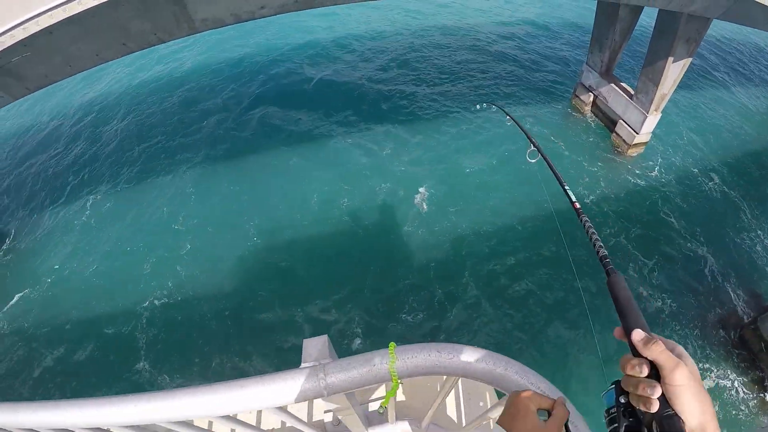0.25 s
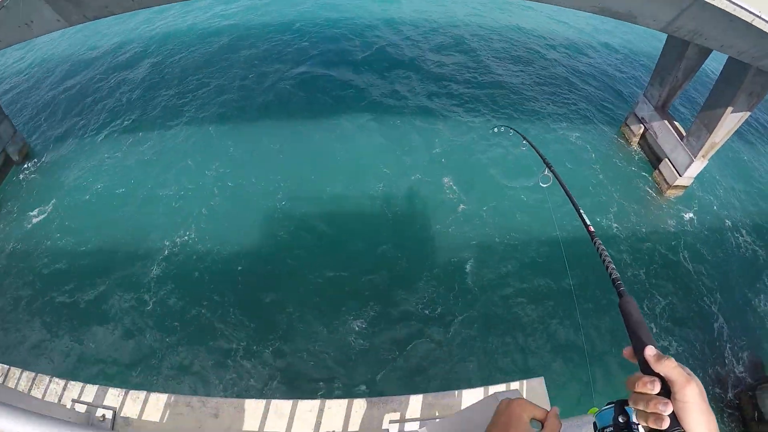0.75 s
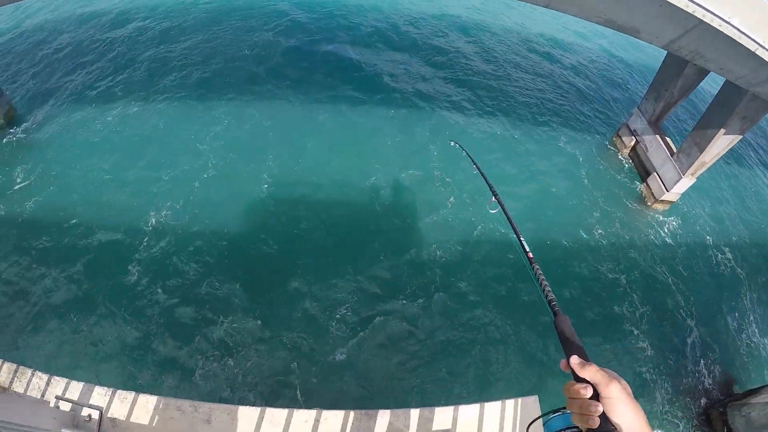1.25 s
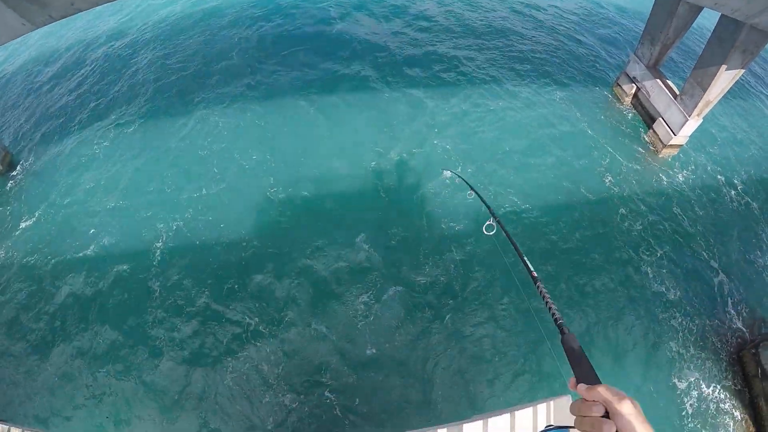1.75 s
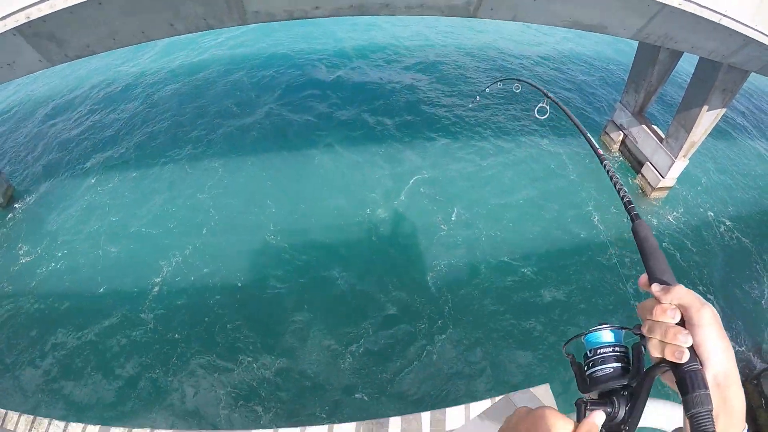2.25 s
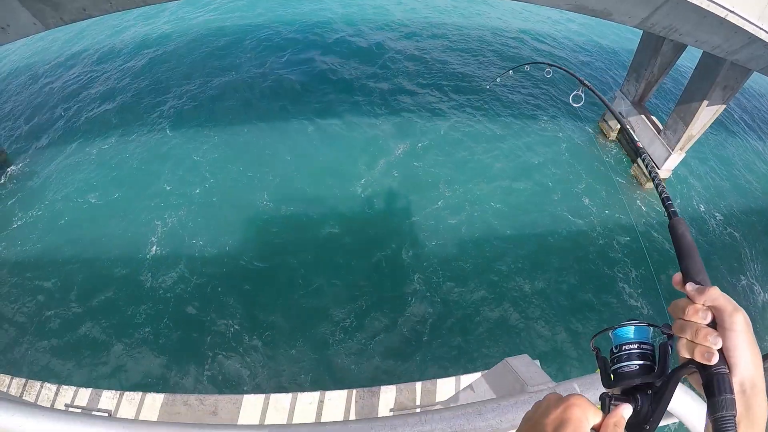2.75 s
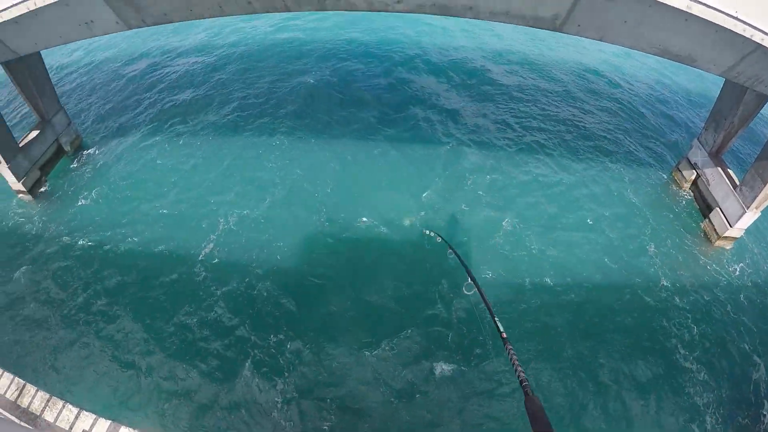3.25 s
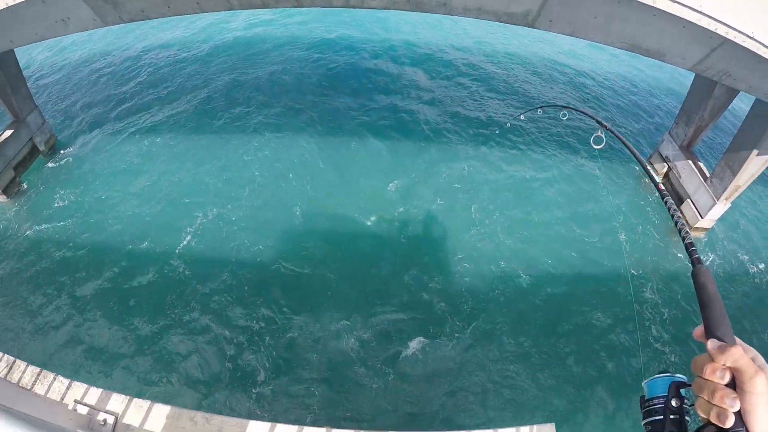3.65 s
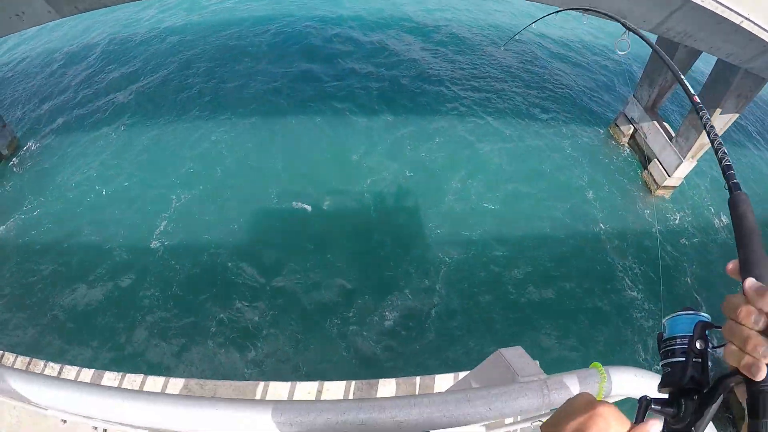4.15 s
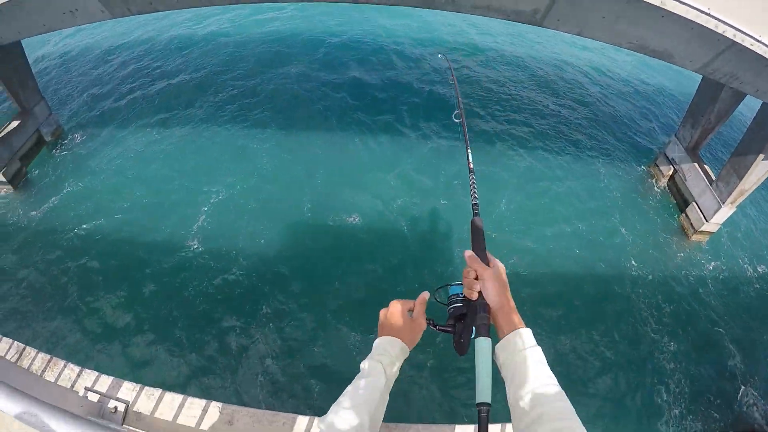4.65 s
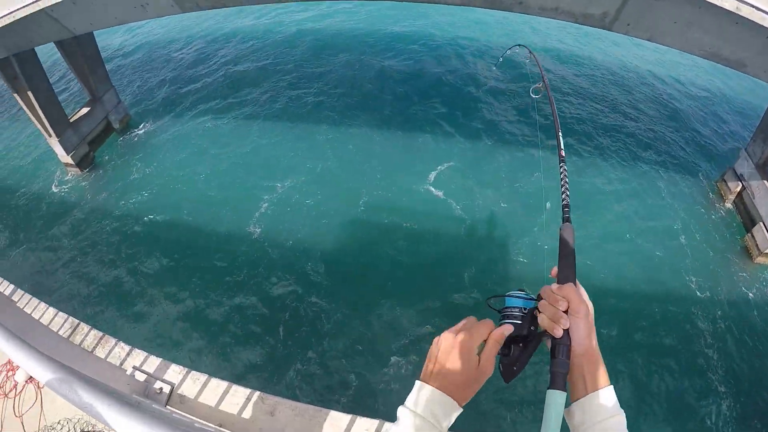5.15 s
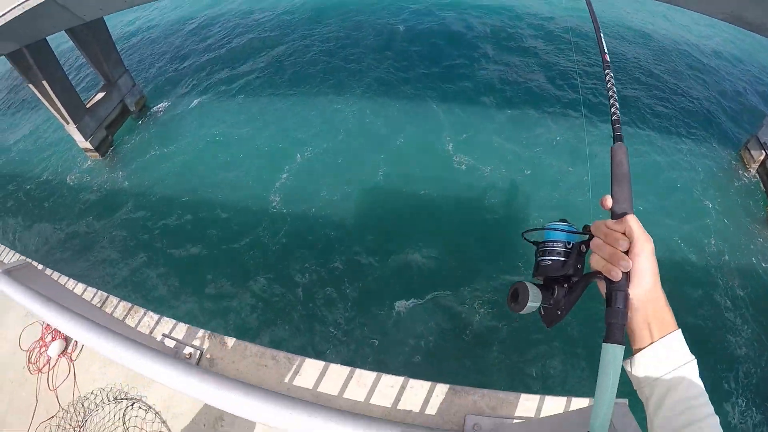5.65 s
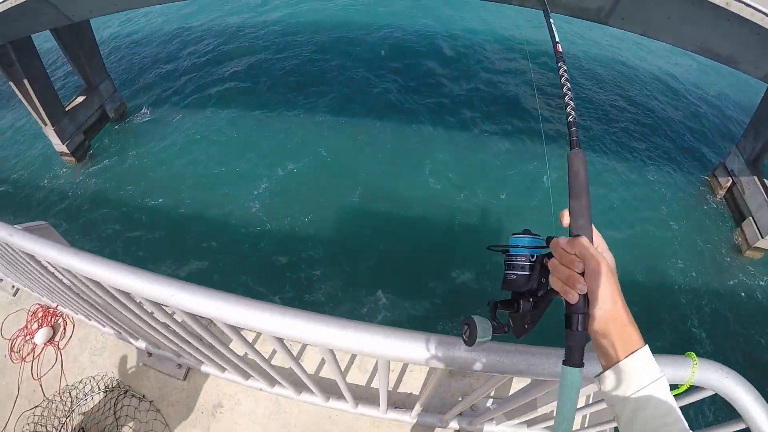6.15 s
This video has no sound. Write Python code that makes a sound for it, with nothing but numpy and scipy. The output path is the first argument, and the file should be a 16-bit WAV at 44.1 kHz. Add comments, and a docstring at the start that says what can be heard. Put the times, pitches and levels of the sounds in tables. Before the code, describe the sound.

Wind thumps and flutters over a continuous muffled sea rush and thin hiss; a fishing reel briefly clicks, then a heavier gust strikes near the end.

```python
"""On a bridge over the sea, wind buffets the microphone of a camera worn by an angler.
Turbulence at the port is low noise, shaped by gusts and single thumps, over a rush of water and air:
bands of noise coloured by the hollows of the camera case. Swells of bright noise are the line swishing
as the rod is worked; midway, decaying modes and grit make a short run of ratchet clicks on the reel,
and a faint tone sings on. Now and then the hiss drops out for an instant."""
import sys
import numpy as np
from scipy import signal
from scipy.fft import rfft, irfft
from scipy.io import wavfile

SR = 44100
rng = np.random.default_rng(int(sys.argv[2]) if len(sys.argv) > 2 else 0)


def dump_mix(stems):
    """Bounce the given channels to the path in sys.argv[1] as a 16-bit WAV at rate SR."""
    frames = np.atleast_2d(stems).T  # one column per channel
    limited = np.clip(frames, -1, 1)  # hard clip at full scale
    pcm = np.round(limited * 32767).astype(np.int16)
    wavfile.write(sys.argv[1], SR, pcm)


N = 282240
TIME = np.arange(N) / SR
BINS = np.fft.rfftfreq(N, 1 / SR)

# All table levels are relative: the functions add their own level settings.
# Every *_COLOUR table is a noise spectrum with columns: frequency_hz, density_db (per Hz).


def amp(db):
    """Decibel law: level to amplitude ratio."""
    return 10 ** (np.asarray(db) / 20)


def evened(x):
    """Power normalisation: scales to rms 1."""
    return x / np.sqrt(np.mean(x ** 2) + 1e-20)


def gains(rows):
    """Envelope interpolation, linear in decibels: one gain curve for each level column."""
    times_s, *columns = np.transpose(rows)
    return [amp(np.interp(TIME, times_s, levels_db)) for levels_db in columns]


def swells(rows):
    """Superposition of Gaussian envelopes, one for each row."""
    return sum(amp(db) * np.exp(-((TIME - s) / half) ** 2) for s, db, half in rows)


def noise(colour):
    """Spectral shaping: Gaussian noise of rms 1, with 12 dB per octave skirts beyond the table."""
    hz, db = np.transpose(colour)
    skirts = np.minimum(1, BINS / hz[0]) ** 2 / np.maximum(1, BINS / hz[-1]) ** 2
    shape = amp(np.interp(np.log(BINS + 1), np.log(hz + 1), db)) * skirts
    white = rng.standard_normal(N)
    return evened(irfft(rfft(white) * shape, N))


def wander(hz):
    """Slow random modulation: low-passed noise of rms 1, up to about the given rate."""
    white = rng.standard_normal(N)
    return evened(irfft(rfft(white) * np.exp(-(BINS / hz) ** 2), N))


def below(x, hz, order=8):
    """Low-pass filtering without phase shift."""
    return irfft(rfft(x) / (1 + (BINS / hz) ** order), N)


def eddies(colour, evenness):
    """Envelope compression: turbulence whose lulls are partly filled, so gusts decide its strength."""
    x = noise(colour)
    size = np.sqrt(abs(signal.hilbert(x)) ** 2 + 0.42)
    return evened(x / size ** evenness)


def add(mix, s, sound):
    """Superposition: mixes a sound in at time s."""
    part = mix[round(s * SR):][:len(sound)]
    part += sound[:len(part)]


# rush of water and air: time_s, body_db, case_ring_db, upper_db
RUSH_LEVELS = [(0, -52, -48.5, -49.5), (0.3, -52.5, -48, -50), (0.7, -54, -49, -54.0),
               (1.3, -52.5, -43.5, -53.5), (1.63, -50.5, -44.5, -51.5), (1.9, -53.0, -49.5, -52),
               (2.8, -54, -47.5, -53.5), (3.08, -50.5, -43.0, -50.5), (3.3, -49.5, -47.5, -49.5),
               (3.7, -52.5, -48.5, -55.0), (3.95, -52, -46, -53.5), (4.3, -52, -47.5, -52),
               (4.6, -50.5, -44.5, -52), (4.97, -49, -46.0, -49), (5.3, -51.5, -48.5, -52),
               (5.7, -53, -47, -52), (6.05, -54.5, -49.5, -54.5), (6.4, -54, -48.5, -55)]
# ordinary level of the rush, from which its low end and the hiss follow it (dB)
RUSH_DB = -52
# soft swishes, probably line sliding through the rod rings: centre_s, level_db, half_length_s (to 1/e)
SWISHES = [(1.08, -69, .07), (2.59, -70, 0.084), (3.26, -65.5, 0.29), (4.65, -69, .05), (5.8, -71, 0.18)]
# the hiss, its finest treble and the swishes: frequency_hz, density_db (per Hz)
SPRAY_COLOUR = [(3500, -10.5), (4700, 11), (5400, -1), (5560, 7.5), (5700, 1), (5900, -0.5), (6300, 3),
                (6600, -0.5), (6850, 2), (7600, -3.5), (8300, -7), (10000, -43)]
FIZZ_COLOUR = [(6500, -25), (8400, 1), (9000, 1), (9700, 1), (10100, 1), (10600, -0.5), (11300, -1.5),
               (12300, -2), (13200, -2.5), (15300, -4.5)]
SWISH_COLOUR = [(3800, 2), (4800, 13.5), (5200, 4), (5550, 10), (5870, 0), (6200, 7), (6550, 1),
                (6800, 6.5), (7300, -1), (7900, -1), (8500, -6), (9050, -5), (9400, 2), (9900, 0),
                (10500, -10), (11500, -13), (11900, -3), (12400, -3), (12800, -11), (13400, -9),
                (14000, -18)]


def spray(hiss_db=-65, fizz_db=-73, follow=0.15, swish_db=5.5, flicker_db=1.0, drift_db=.5):
    """Amplitude-modulated noise: a thin flickering hiss follows the rush a little, under swishes."""
    upper = gains(RUSH_LEVELS)[-1]
    bed = (upper / amp(RUSH_DB)) ** follow * amp(drift_db * wander(9))
    hiss = bed * (amp(hiss_db) * noise(SPRAY_COLOUR) + amp(fizz_db) * noise(FIZZ_COLOUR))
    swish = amp(swish_db) * swells(SWISHES) * noise(SWISH_COLOUR)
    return (hiss + swish) * amp(flicker_db * wander(120))


# bands of the rush, from low to high: frequency_hz, density_db (per Hz)
LOW_COLOUR = [(150, -10.5), (350, -4.5), (530, -0.5), (680, 3), (780, 6), (880, -8), (1100, -49)]
BODY_COLOUR = [(600, -27), (760, -5), (850, 2), (970, 3), (1080, 1.5), (1180, -6), (1400, -3), (2200, -44)]
RING_COLOUR = [(900, -59), (1200, -20.5), (1400, -7.5), (1520, -1), (1600, 3.5), (1660, 1), (1720, 3.5),
               (1790, -4), (1920, -1.5), (2150, -8.5), (2600, -30)]
SHOULDER_COLOUR = [(1400, -56), (1650, 0), (1760, 2.5), (1920, -11), (2100, -32), (2400, -17), (2650, -3.5),
                   (3000, -42)]
UPPER_COLOUR = [(1700, -19), (2200, 2.5), (2620, 4.5), (2870, 1), (3020, 4), (3220, 3), (3380, 2),
                (3560, 3.5), (3780, 4), (4030, -13), (4280, -4.5), (4480, -15.5), (4730, -13.5),
                (5300, -31)]


def rush(low_db=-6.5, low_follow=0.98, body_db=-0.34, ring_db=-0.4, upper_db=-.3,
         shoulder_db=-6, shoulder_reference_db=-45, churn_db=0.76, throb_db=.5):
    """Resonant colouring: churning water and air heard through the broad resonances of the case."""
    body, ring, upper = gains(RUSH_LEVELS)
    low = amp(RUSH_DB + low_db) * (body / amp(RUSH_DB)) ** low_follow
    roar = low * noise(LOW_COLOUR) + amp(body_db) * body * noise(BODY_COLOUR)
    # the stronger the hollow ring, the larger the share of its shoulder
    shoulder = amp(shoulder_db) * ring / amp(shoulder_reference_db) * noise(SHOULDER_COLOUR)
    throb = amp(throb_db * wander(17))
    hollow = amp(ring_db) * ring * (noise(RING_COLOUR) + shoulder) * throb
    high = amp(upper_db) * upper * noise(UPPER_COLOUR)
    return (roar + hollow + high) * amp(churn_db * wander(25))


# brief dropouts of the hiss: centre_s, length_s (between 1/e points of the cut in dB), depth_db
DIPS = [(0.172, .013, 30), (.301, 0.011, 16), (0.687, .012, 24), (0.876, 0.018, 13), (1.272, 0.033, 28),
        (1.942, 0.023, 12), (2.263, 0.01, 19), (2.449, 0.033, 30), (2.649, 0.009, 17), (3.805, 0.016, 14),
        (4.394, 0.013, 32), (6.274, 0.02, 13), (6.36, 0.01, 18)]
# faint valleys of the rush that thin in a dropout: centre_hz, half_width_hz (to 1/e), share (of depth)
VALLEYS = [(483, 320, 1), (1250, 82, .5), (2320, 220, 0.36), (2950, 160, 0.37)]


def dropouts(x, split_hz=3900):
    """Time-varying filtering: the hiss dips for instants, and the valleys of the rush thin with it."""
    cut_db = sum(depth * np.exp(-(2 * (TIME - s) / length) ** 4) for s, length, depth in DIPS)
    hiss = x - below(x, split_hz, order=24)
    out = x + hiss * (amp(-cut_db) - 1)
    for hz, width, share in VALLEYS:
        valley = irfft(rfft(x) * np.exp(-((BINS - hz) / width) ** 2), N)
        out = out + valley * (amp(-share * cut_db) - 1)
    return out


# ratchet of the reel: start_s, level_db, brightness_db (relative, of the modes from 8 to 11 kHz)
CLICKS = [(3.4755, -47, -18), (3.5154, -45, -1), (3.5458, -50, -5), (3.5674, -47, -11), (3.5803, -43, -20),
          (3.5912, -40, -24), (3.6012, -38, -26), (3.6124, -38, -36.5), (3.625, -41, -27),
          (3.6426, -43, -26), (3.6671, -46, -20), (3.715, -47, -10)]


def singing(level_db=-25, t60=1.2, pitch_hz=4755):
    """Energy storage: the rim of the spool gathers energy from the clicks and sings on faintly."""
    energy = np.zeros(N)
    t = np.arange(SR) / SR
    for s, db, _ in CLICKS:
        add(energy, s, amp(db - 60 * t / t60) ** 2)
    return amp(level_db) * np.sqrt(energy) * np.sin(2 * np.pi * pitch_hz * TIME)


# modes of the spool, rung by each click: pitch_hz, level_db, t60_s (decay by 60 dB)
SPOOL_MODES = [(4270, -8, 0.027), (4740, -2, 0.031), (5080, -9, .02), (5370, -2.5, 0.021),
               (5600, -4.5, 0.028), (6140, -9, 0.03), (7740, -15.5, 0.039), (8700, -11.5, .02),
               (9300, -9, 0.026), (9750, -9, .02), (12200, -27, .15)]


def reel(level_db=2.5, rise_s=.0006, bright=0.73, snap_db=-13, snap_s=0.0026):
    """Modal excitation: the pawl snaps over its teeth, a gritty tick and the ring of the spool."""
    t, out = np.arange(SR // 2) / SR, np.zeros(N)
    treble = signal.butter(2, [4500, 12000], "band", fs=SR, output="sos")
    for s, db, bright_db in CLICKS:
        ring = np.zeros(len(t))
        for hz, mode_db, t60 in SPOOL_MODES:
            tilt_db = bright * (bright_db + 13) * (8000 < hz < 11000)
            decay = amp(mode_db + tilt_db - 60 * t / t60)
            ring += decay * np.sin(2 * np.pi * (hz * t + rng.random()))
        grit = signal.sosfilt(treble, rng.standard_normal(len(t)))
        click = ring / abs(ring).max() + amp(snap_db) * grit * np.exp(-t / snap_s)
        onset = 1 - np.exp(-t / rise_s)
        add(out, s, amp(db + level_db) * click * onset)
    return out


# single eddies that strike the port: start_s, level_db, rise_s
THUMPS = [(.568, -32.5, 0.0091), (1.098, -29.5, 0.013), (4.5, -29.5, 0.016), (4.788, -35, 0.015),
          (5.446, -35, 0.0061), (5.695, -28.5, 0.012), (6.053, -31.5, 0.012), (6.143, -26, 0.012)]
# dull noise of a thump: frequency_hz, density_db (per Hz)
THUMP_COLOUR = [(45, -10), (62, 5), (85, 0), (115, -15.5), (150, -24), (250, -28), (400, -39)]


def thumps(level_db=0):
    """Impulsive loading: each large eddy shoves the membrane with a fast rise and a slower decay."""
    force = np.zeros(N)
    u = np.arange(SR // 4) / SR
    for s, db, rise in THUMPS:
        add(force, s, amp(db) * u / rise * np.exp(1 - u / rise))
    return amp(level_db) * force * eddies(THUMP_COLOUR, evenness=1) / np.sqrt(2)


# strength of the wind at the port: time_s, level_db
WIND_LEVELS = [(0, -40.5), (0.85, -39.5), (2.2, -32.5), (2.8, -38.0), (3.3, -26.0), (3.7, -29.0),
               (4.2, -34.5), (4.7, -29.0), (5.25, -33.5), (5.7, -29.5), (6.4, -34.5)]
# ordinary wind strength, from which the buffeting follows it (dB)
BREEZE_DB = -33
# gusts that swell and sink over the port: centre_s, level_db, half_length_s (to 1/e)
GUSTS = [(.56, -33, 0.035), (1.17, -28.5, 0.036), (1.67, -34, 0.045), (1.83, -30, 0.017),
         (2.26, -29, 0.026), (2.41, -30.5, 0.035), (2.6, -34.5, 0.061), (4.56, -22.5, 0.051),
         (4.69, -28.5, 0.083), (5.78, -24, 0.024), (5.96, -22, 0.023), (6.075, -11.5, .028),
         (6.19, -19, 0.038)]
# flutter of small eddies: time_s, level_db
FLUTTER_LEVELS = [(0, -55), (0.9, -61), (1.1, -56.5), (2.68, -57.5), (2.8, -51), (3.55, -57.0),
                  (3.8, -53.5), (4.3, -56.5), (4.95, -52.5), (5.25, -53.5), (5.62, -49), (5.88, -56.5),
                  (6.4, -59.5)]
# large, middle and small eddies: frequency_hz, density_db (per Hz)
SWING_COLOUR = [(6, -8), (12, -1), (22, -4), (34, -3), (44, -10.5), (56, -24), (90, -63)]
BUFFET_COLOUR = [(35, -81), (52, 4.5), (72, 1.5), (100, -4), (130, -12), (200, -22.5), (400, -40)]
FLUTTER_COLOUR = [(80, -16), (140, 1), (200, -2.5), (275, -1.5), (310, -4.5), (350, -12), (480, -16.5),
                  (900, -34.5)]


def wind(swing_db=1.0, swing_top_hz=58, puffy_db=1.5, gust_db=3.0, buffet_db=-48, buffet_follow=0.63,
         gust_share=.3, flutter_db=-.5, lumpy_db=4, ragged_db=1.5):
    """Turbulent pressure: large eddies heave the membrane, while smaller ones come in lumps."""
    steady, = gains(WIND_LEVELS)
    flutter, = gains(FLUTTER_LEVELS)
    gusts = swells(GUSTS)
    lumps = np.clip(wander(21.5), -2, 2)
    puffs = amp(puffy_db * wander(12))
    heave = steady * evened(eddies(SWING_COLOUR, evenness=0.5) * puffs)
    surge = gusts * eddies(SWING_COLOUR, evenness=0.62)
    large = below(amp(swing_db) * heave + amp(gust_db) * surge, swing_top_hz)
    # buffeting grows with the wind, but less than in proportion
    strength = np.hypot(steady, gust_share * gusts) / amp(BREEZE_DB)
    buffet = amp(buffet_db) * strength ** buffet_follow
    middle = buffet * evened(eddies(BUFFET_COLOUR, evenness=0.43) * amp(lumpy_db * lumps))
    small = amp(flutter_db) * flutter * evened(noise(FLUTTER_COLOUR) * amp(ragged_db * lumps))
    return large + middle + small + thumps()


def scene():
    """Superposition of wind, rush, spray and reel at one microphone; the reel escapes the dropouts."""
    return (dropouts(spray() + rush() + wind()) + singing() + reel())[None]


def record(dry, edge_hz=15300):
    """Band limitation: a linear-phase low-pass stands for the recorder."""
    lowpass = signal.firwin(511, edge_hz, window=("kaiser", 9), fs=SR)
    return signal.oaconvolve(dry, lowpass[None], "same")


dry = scene()
out = record(dry)
dump_mix(out)
```